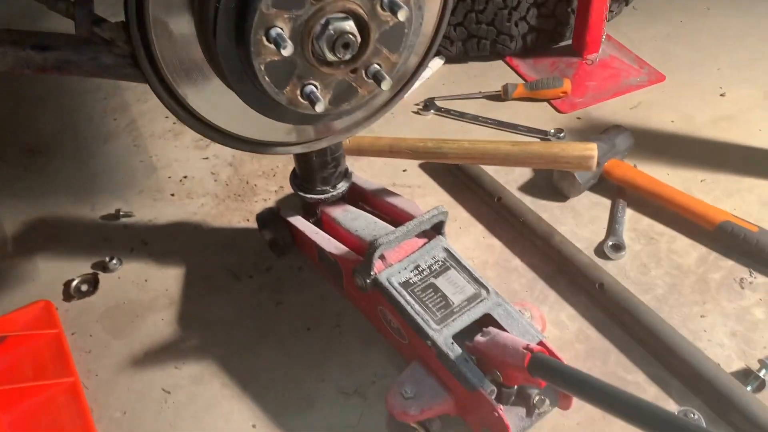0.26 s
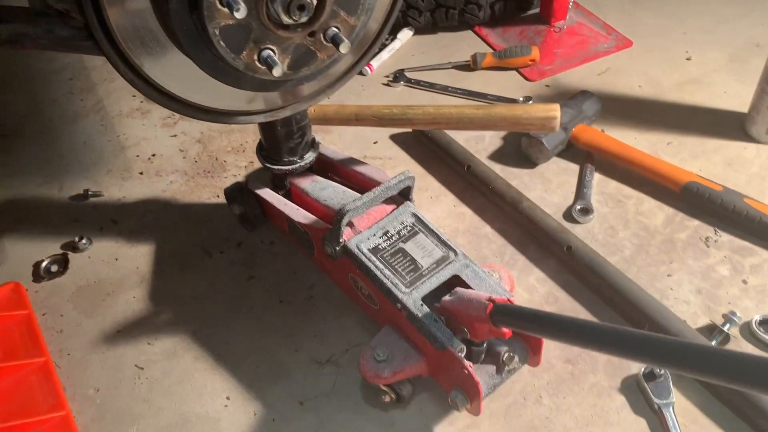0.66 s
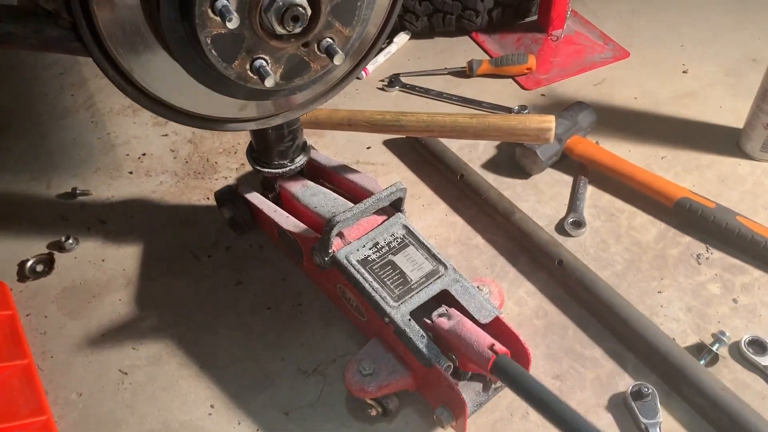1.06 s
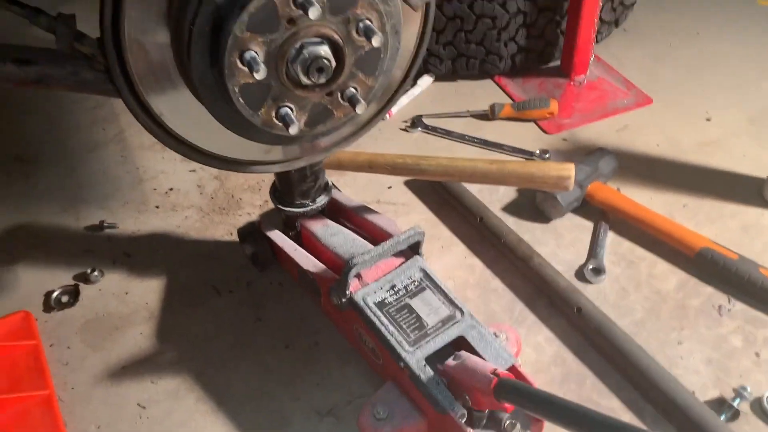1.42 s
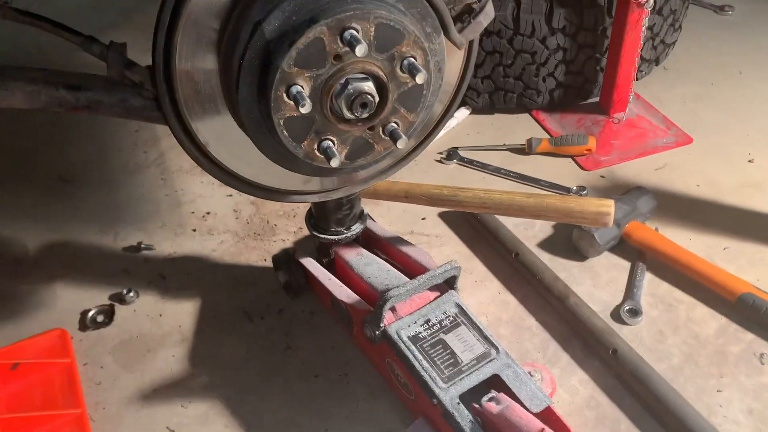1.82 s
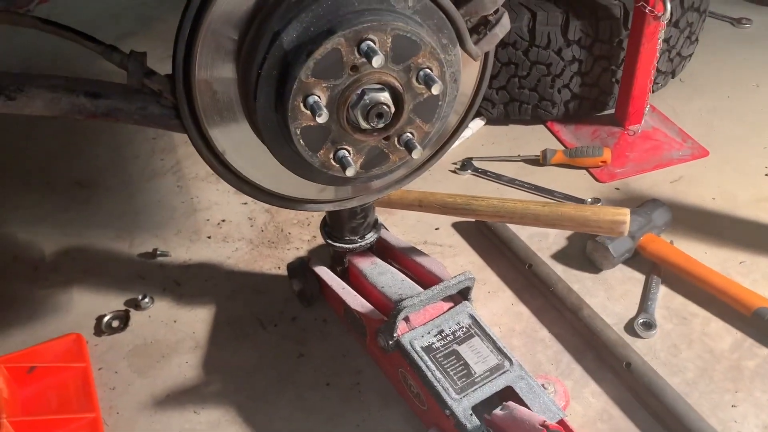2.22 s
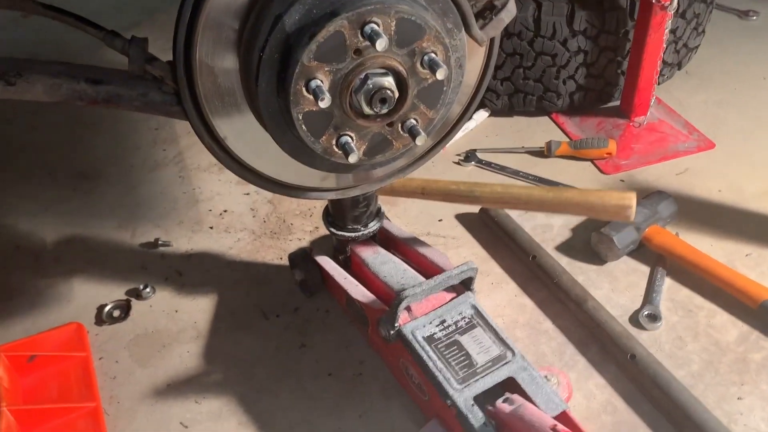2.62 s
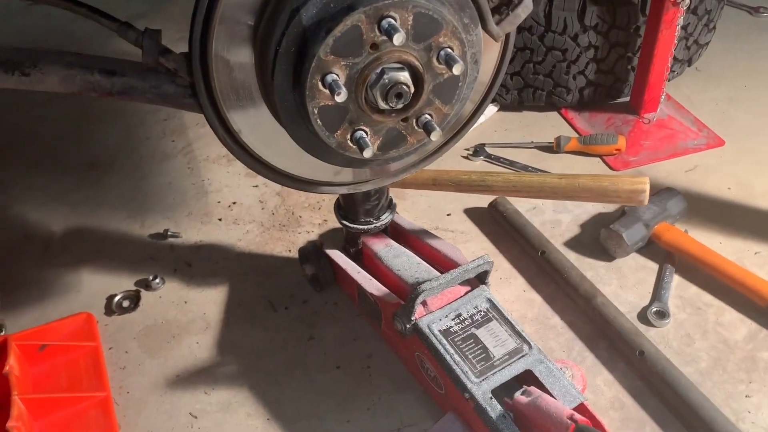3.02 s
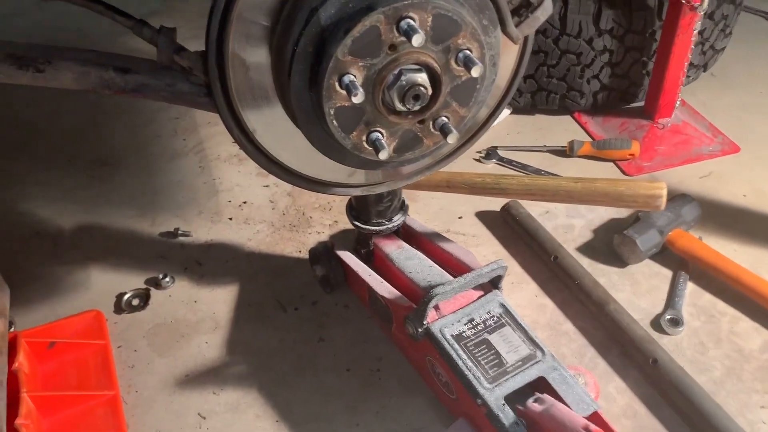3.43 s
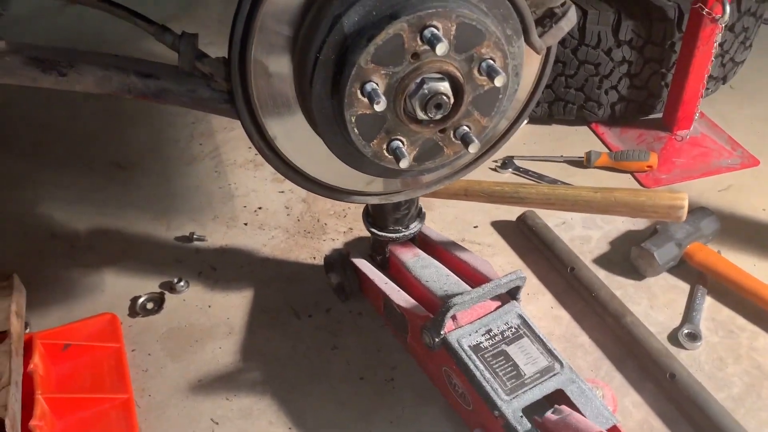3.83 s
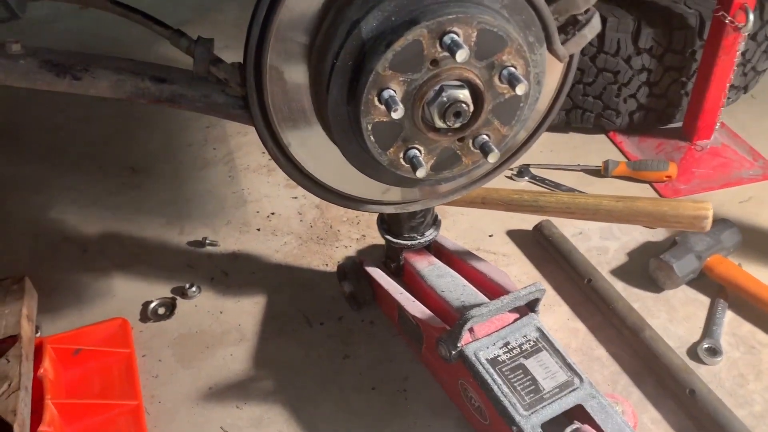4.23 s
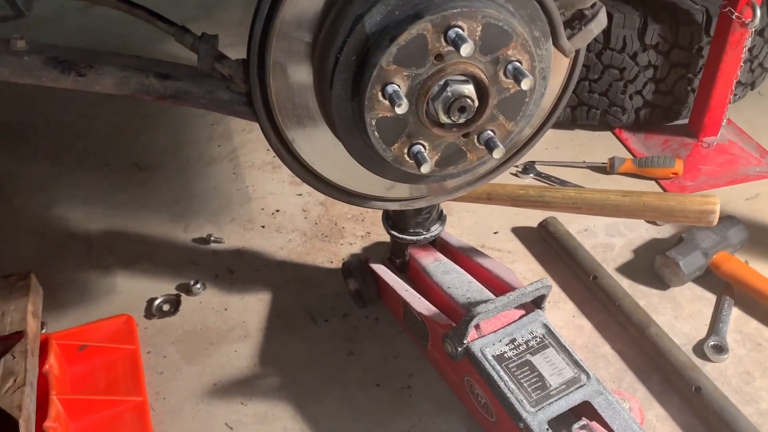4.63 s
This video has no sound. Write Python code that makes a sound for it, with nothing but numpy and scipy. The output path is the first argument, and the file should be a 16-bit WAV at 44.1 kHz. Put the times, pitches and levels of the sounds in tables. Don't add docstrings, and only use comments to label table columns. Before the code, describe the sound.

In a reverberant garage, a steel jack clicks and clanks with dry, mid-pitched knocks, bright pin pings and gritty scraping under load. Quiet gaps hold soft hiss and low handling rumble. One strong clank stands out near the middle, smaller clicks and rattles follow, and a heavy cluster of crashing blows with a floor thump ends it. Wide, close stereo phone pickup.

```python
import sys
import numpy as np
from scipy import signal
from scipy.fft import rfft, irfft, next_fast_len
from scipy.io import wavfile
from scipy.ndimage import uniform_filter1d

SR = 44100
rng = np.random.default_rng(int(sys.argv[2]) if len(sys.argv) > 2 else 0)


def wav_record(signal):
    frames = np.transpose(np.atleast_2d(signal))
    bounded = np.clip(frames, -1, 1)
    quanta = np.round(bounded * 32767).astype(np.int16)
    wavfile.write(sys.argv[1], SR, quanta)


def convert_level_to_amplitude(level_db):
    exponent = np.asarray(level_db, float) / 20
    return 10 ** exponent


N = 214568

# t/s, level/dB
JOLTS = [(.15, -62), (.6, -50), (.75, -66), (1.31, -50.5), (1.53, -68), (1.77, -54.5), (2.14, -56.5),
         (2.41, -44.5), (2.61, -58), (3.03, -51), (3.51, -44.5), (3.68, -50.5), (3.9, -52), (4.04, -43),
         (4.27, -46), (4.562, -49.5), (4.87, -53)]
# t/s, level/dB
STIR = [(0, -67), (.07, -81), (.2, -72), (.42, -59), (.81, -56), (1.0, -61), (2.19, -64), (2.45, -51),
        (2.97, -60), (3.3, -74), (3.4, -61), (3.54, -62), (4.08, -51), (4.72, -43.5), (4.87, -23.5)]
# f/Hz, level/dB per Hz
AIR_COLOUR = [(80, -0.5), (160, -13), (300, -9), (500, -10), (750, -13), (1900, -14), (4000, -23.5),
              (8000, -36), (16000, -54.5)]

# t/s, level/dB, main note f/Hz, brightness/dB
KNOCKS = [(.647, -39.5, 1960, -3.5), (.668, -27, 2190, -10.5), (1.7235, -13.5, 1953, -8),
          (1.745, -25, 1330, -4.5), (2.3538, -7, 2260, -5.5), (2.527, -28.5, 2340, -4.5),
          (3.381, -32, 1930, 1.5), (3.494, -47, 1700, 7), (3.664, -32, 1680, -3), (3.734, -33.5, 2060, -15),
          (3.811, -22, 2100, -15), (3.983, -22, 990, -7), (4.111, -43, 2100, 10), (4.494, -29.5, 873, -8),
          (4.738, -5, 1210, -6)]
# t/s, level/dB, main note f/Hz, brightness/dB
TICKS = [(.558, -34, 1930, -12), (.818, -35, 1880, -16), (.956, -36.5, 1380, -15.5),
         (1.288, -25, 1640, -39), (1.439, -37, 1960, -6), (1.638, -46, 1730, -7), (2.115, -27.5, 2130, -15),
         (2.285, -31, 1340, -13), (2.555, -23, 1990, 0.5), (2.573, -17.5, 1324, -11),
         (2.668, -32, 1610, -11.5), (2.693, -24.5, 1700, -16), (2.717, -26.5, 1680, -28),
         (2.748, -29.5, 1880, -33), (2.78, -74, 1850, -30), (2.912, -34.5, 1310, -64),
         (3.1, -39.5, 1110, -31), (3.325, -55, 1760, -3), (3.52, -44, 1430, 9), (3.926, -31, 1880, -8.5),
         (4.158, -37, 1910, 14.5), (4.407, -33.5, 1890, -3.5), (4.584, -34, 959, -1.5),
         (4.757, -8, 1210, -2.5)]
# t/s, level/dB, main note f/Hz, brightness/dB
CLICKS = [(.186, -64.5, 2250, 11), (.898, -27, 1370, -13), (.663, -34, 1840, -16),
          (1.239, -22.5, 2030, -1.5), (1.276, -22, 1690, -14), (1.318, -57, 1700, 14),
          (1.736, -19.5, 3140, -9.5), (1.756, -24.5, 990, -10), (2.363, -20, 2310, -14),
          (3.424, -13.5, 1697, -31), (3.483, -44, 1370, -15), (4.135, -17, 2140, -13),
          (4.316, -38, 2180, -1)]
# t/s, level/dB, main note f/Hz, brightness/dB
RATTLES = [
    (.462, -47, 1990, -7.5),
    (.572, -36.5, 1640, -7.5),
    (.851, -43.5, 1950, -24),
    (2.086, -33.5, 1950, 2.5),
    (2.957, -29.5, 1960, -4.5),
    (3.779, -30.5, 1880, 5),
    (4.62, -35, 1880, -22),
]
# t/s, level/dB, main note f/Hz, brightness/dB
SLAMS = [
    (4.722, -2, 1900, -9),
    (4.772, -3.5, 778, -8),
    (4.796, -8.5, 1520, -1),
]
# edge at 3-6.5 kHz/dB, sizzle above/dB, rattle length/s
KNOCK, TICK, CLICK = (0.52, -13.5, 0.0056), (0.5, -0.87, 0.0058), (-30, 0.5, 0.0049)
RATTLE, SLAM = (-1.1, 3.5, 0.018), (0.57, -25, 0.01)
LEAD_IN_S, LEAD_IN_DB = 0.012, -18
# f/Hz, level/dB, time to fall 60 dB/s
FRAME = [(528.2, -8.5, 0.27), (605, -5, 0.15), (747, -10.5, .12), (952, 3.5, 0.037), (1330, -3.5, 0.043),
         (1325, -2.5, 0.15), (1600, -20, 0.44), (1626, 0.5, 0.21), (1960, 15, 0.027), (2180, 3.5, 0.1),
         (3020, -8.5, 0.14), (3830, 0.5, 0.038)]

# f/Hz, time to fall 60 dB/s
GARAGE = [(120, 0.7), (330, 0.69), (870, 0.62), (2300, 0.71), (6060, 0.5), (16000, 0.21)]
GARAGE_DB = -8.5
# t/s, level/dB
SNAPS = [(0.185, -56), (0.5591, -49), (0.6479, -37), (0.6689, -47), (0.818, -49), (0.852, -34),
         (0.891, -33), (0.9572, -51), (1.1872, -53), (1.2381, -27), (1.5529, -58), (1.7235, -28),
         (2.354, -28), (2.5541, -6), (2.6683, -40), (2.6933, -35), (2.9547, -13), (3.421, -28),
         (3.477, -38), (3.4934, -30), (3.5214, -32), (3.7808, -24), (3.984, -38), (4.1126, -20),
         (4.135, -20), (4.157, -11), (4.291, -33), (4.3163, -17.5), (4.4064, -34), (4.5321, -28),
         (4.5795, -31), (4.6329, -36), (4.7198, 4)]

# t/s of the top, rise/s, fall/s, level/dB, hiss/dB
SLIDES = [(.273, .065, 0.055, -23, -2.5), (.92, .1, 0.013, -50, -28), (1.128, 0.046, 0.043, -54, -9),
          (1.6, .2, 0.25, -50.5, -36), (2.36, .003, .03, -8.5, -13), (2.4, .03, 0.33, -34.5, -34),
          (2.58, .04, .022, -33, -25), (3.486, .035, 0.1, -41, 6), (3.6, .12, 0.051, -54, -15),
          (3.79, .012, 0.24, -52, 7), (3.812, .02, 0.023, -24.5, -25), (4.078, 0.045, 0.13, -29.5, -3),
          (4.144, .07, 0.044, -26, -1), (4.33, .2, 0.013, -39.5, -1.5), (4.71, .03, .012, -30, 2),
          (4.723, .003, .03, -0.5, 3)]
# t/s of the top, rise/s, fall/s, level/dB, hiss/dB
DRAGS = [
    (.86, 0.029, 0.099, -41, -32),
    (2.095, .03, .12, -35, -1),
    (2.7, 0.11, 0.052, -38.5, -13),
    (4.02, 0.025, .12, -38, -32),
    (4.23, 0.096, 0.12, -42, -8),
    (4.5, 0.021, 0.36, -43.5, 10),
    (4.62, .022, 0.19, -32.5, -1.5),
    (4.745, .022, .35, -8, -9),
]
# f/Hz, level/dB per Hz
SCRAPE_COLOUR = [(350, -71), (600, -54), (896, -19), (1110, -8), (1640, -7), (2040, -7.5), (2860, -9.5),
                 (3140, -12.5), (7000, -30), (9100, -59), (15400, -120)]
SLIDE_LOW_DB, DRAG_LOW_DB = -23, -9.5
STROKE_ENDS_DB, STROKE_BEND = -34.5, 1.58
HISS_FOLLOWS = 1.32

# t/s, length/s, level/dB, f/Hz
GROANS = [
    (.24, .075, -44, 1170),
    (.255, .04, -42, 2050),
    (.463, .015, -50, 2000),
    (.86, .04, -52, 1950),
    (.9, .05, -53, 780),
    (3.0, .1, -55, 320),
    (3.67, .1, -60, 5650),
    (4.0, .07, -53, 560),
]
# t/s, length/s, level/dB, f/Hz
CREAKS = [(.585, .065, -59, 574), (.855, .035, -58, 3950), (1.53, .13, -62, 486), (1.54, .16, -64, 5500),
          (2.68, .07, -55, 570), (3.12, .24, -71, 1502), (3.33, .04, -66, 1500), (3.475, .03, -58, 5600),
          (4.49, .09, -48, 902), (4.495, .05, -49, 1600), (4.5, .03, -55, 4100), (4.5, .18, -49, 330),
          (4.635, .06, -49, 1530)]

# t/s, level/dB, f/Hz, time to fall 60 dB/s
THUMPS = [(0.589, -42.5, 180, 0.088), (0.9, -43, 164.4, 0.087), (1.282, -37.5, 164.7, 0.11),
          (1.443, -43.5, 188, 0.075), (1.74, -35.5, 169.6, 0.11), (2.111, -37, 156.4, 0.15),
          (2.369, -33.5, 136, 0.18), (2.399, -36.5, 171, 0.19), (2.576, -34, 155.7, 0.14),
          (2.73, -46, 145, 0.13), (2.918, -48.5, 143.4, 0.36), (2.995, -35, 221, 0.096),
          (3.438, -35.5, 113.1, 0.18), (3.738, -41, 151, 0.18), (3.809, -42, 224.6, 0.18),
          (3.988, -35.5, 88, 0.07), (4.155, -30.5, 154.7, 0.18), (4.491, -42.5, 292, 0.37),
          (4.619, -49, 334, 0.36), (4.732, -11, 296, 0.063), (4.754, -6, 114, 0.12)]
# t/s, level/dB, added note of the struck spot f/Hz, ring time factor
PINGS = [(0.8604, -43, 6020, 0.87), (0.906, -41, 8570, 0.65), (1.2375, -27, 11300, 0.48),
         (1.3184, -40.5, 8700, 0.49), (1.7226, -25, 6800, 0.43), (2.0877, -24, 7970, 0.71),
         (2.2817, -40.5, 6760, 0.5), (2.3535, -26.5, 5160, 1.5), (2.5235, -19.5, 7910, 0.3),
         (2.5537, -16.5, 8910, 0.45), (2.6928, -39, 8050, 0.35), (2.9552, -26, 7970, 0.99),
         (3.382, -27, 8960, 0.56), (3.6647, -41.5, 5540, 0.76), (3.78, -14.5, 8990, 0.96),
         (4.125, -20, 7910, 0.4), (4.1584, -20, 8200, 0.25), (4.5796, -19, 14900, 0.92),
         (4.7217, -2, 8080, 0.74)]
# f/Hz, level/dB, time to fall 60 dB/s
TUBE = [(5580, -17, 0.67), (5860, -8, 0.21), (6670, -11.5, 0.21), (7970, 0.5, 0.15), (9126, 16, 0.069),
        (10270, -3.5, 0.061), (10900, -26, 0.031), (11100, -9.5, 0.047), (14330, -5.5, .12),
        (15000, -2, 0.13)]
LOOSE_FIT, LOOSE_HZ = 0.6, 25

# t/s, level/dB, rise time/s
ARM_BLOW, PIN_BLOW, AXLE_BLOW = (2.354, -20, 0.0068), (2.955, -37.5, 0.001), (4.724, -12.5, 0.0032)
# f/Hz, level/dB, time to fall 60 dB/s
ARM = [(1089, -5, 0.32), (1170, -13, 0.22), (1670, -13, 0.17), (1730, -12, .25), (2100, -13.5, .15),
       (2263, 1, 0.78), (3584, 4.5, 0.12), (4075, 3, 0.25), (596, -7, 0.4), (1360, -12, 0.37),
       (3590, -2, .3), (4382, -11, 0.35), (5200, -12, 0.11), (1184, -5.5, .7)]
# f/Hz, level/dB, time to fall 60 dB/s
PIN = [(1265, -10, .4), (1700, -6, 0.57), (3268, -1, 0.3), (3429, -14, 0.15), (3806, -16, 0.26),
       (4500, -6, .1), (5905, -5, 0.39), (6730, -4, 0.26), (7860, 2.5, 0.34), (8592, -12, .3)]
# f/Hz, level/dB, time to fall 60 dB/s
AXLE = [(129.4, 5.5, 0.17), (246.6, 7, 0.16), (342, 3.5, 0.18), (489, -4, 0.64), (620, 0, 0.47),
        (805.4, 6, 0.47), (950, -10, 0.26), (1247, -8, 0.39), (1580, -11, 0.42), (1620, -0.5, 0.71),
        (1880, -12, 0.94)]

# f/Hz, likeness 0-1
PORTS_SAME = [(60, 0.99), (600, 0.85), (1100, 0.57), (1900, 0.01), (2700, 0.52), (6000, 0.21), (7200, 0.7),
              (9000, 0), (16000, 0)]
# f/Hz, share 0-1
PORTS_LAG = [(500, .05), (1000, .2), (1600, .45), (2300, .85), (3500, 1)]
# f/Hz, level/dB
PORTS_TILT = [(60, -0.5), (200, 1), (700, 0.5), (1290, 3.5), (2380, 1), (4400, 0), (8120, -3.5),
              (15000, 1.5)]
PORT_DELAY_S = 258e-6
DIP_S, DIP_HALF_S = 2.772, 0.011


def evened(x):
    return x / np.sqrt(np.mean(x ** 2) + 1e-20)


def read(points, hz):
    f, value = np.transpose(points)
    return np.interp(np.log(hz + 1), np.log(f + 1), value)


def add(mix, s, sound):
    part = mix[:, round(s * SR):][:, :sound.shape[1]]
    part += sound[:, :part.shape[1]]


def band(x, lo_hz, hi_hz):
    sos = signal.butter(2, [lo_hz, min(hi_hz, SR / 2.1)], "band", fs=SR, output="sos")
    return evened(signal.sosfilt(sos, x))


def coloured(x, spectrum):
    hz = np.fft.rfftfreq(x.shape[-1], 1 / SR)
    return evened(irfft(rfft(x) * convert_level_to_amplitude(read(spectrum, hz)), x.shape[-1]))


def patchy(x):
    bins = x.shape[1] // 2 + 1
    bumps = evened(uniform_filter1d(rng.standard_normal(bins), size=max(bins // 36, 1)))
    return evened(irfft(rfft(x) * convert_level_to_amplitude(2.2 * bumps), x.shape[1]))


def gritty(count, grit_db):
    clumps = evened(uniform_filter1d(rng.standard_normal(count), size=90))
    return evened(rng.standard_normal((2, count)) * convert_level_to_amplitude(grit_db * clumps))


def ringing(modes, t, spread_db):
    hz, db, t60 = np.transpose(modes)[..., None]
    weight, phase = rng.random((2, 2, len(modes), 1))
    fading = convert_level_to_amplitude(db + spread_db * (weight - 1.0) - 60 * t / t60)
    return (fading * np.sin(2 * np.pi * (hz * t + phase))).sum(1)


def background():
    t = np.arange(N) / SR
    hand = 0
    for s, db in JOLTS:
        hand = hand + convert_level_to_amplitude(db + np.minimum(125 * (t - s), 117 * (s - t)))
    rumble = band(band(rng.standard_normal((2, N)), 15.0, 110), 3.4, 97) * hand
    air = convert_level_to_amplitude(np.interp(t, *np.transpose(STIR))) * coloured(gritty(N, grit_db=3.0), AIR_COLOUR)
    hiss = convert_level_to_amplitude(-79) * rng.standard_normal((2, N))
    return rumble + air + hiss


def clank(db, hz, edge_db, sizzle_db, length):
    t = np.arange(7000) / SR - LEAD_IN_S
    after = np.maximum(t, 0)
    push = (1 - np.exp(-after / 0.00095)) * np.exp(-after / max(length, 0.001))
    push = push + convert_level_to_amplitude(LEAD_IN_DB) * (t < 0) * (1 + t / LEAD_IN_S)
    grit = gritty(len(t), grit_db=2.0)
    struck = np.sin(2 * np.pi * (hz * t + np.array([[0], [1 / 4]])))
    note = (0.65 * struck + 0.69 * band(grit, hz * 0.912, hz * 1.066)) * push
    body = 0.57 * band(band(grit, 1007, 3280), 460, 3630)
    edge = convert_level_to_amplitude(edge_db) * patchy(band(grit, 2740, 5640))
    sizzle = convert_level_to_amplitude(sizzle_db) * patchy(band(grit, 8860, 14700))
    broad = (body + edge + sizzle) * push
    frame = signal.fftconvolve(grit * push, ringing(FRAME, t - t[0], spread_db=6.5), axes=1)[:, :len(t)]
    frame = 0.66 * frame / abs(frame).max()
    direct = broad + frame + note
    to_room = 1.49 * broad + (frame + note) / 5
    return convert_level_to_amplitude(db - 4.0) * np.vstack([direct, to_room])


def garage(x):
    taps = np.zeros((2, SR))
    at = np.arange(400, SR - 20, 20) + rng.integers(0, 20, (2, (SR - 401) // 20))
    np.put_along_axis(taps, at, rng.choice([-1., 1.], at.shape), 1)
    hz, t, z = signal.stft(taps, SR, nperseg=256)
    dying = convert_level_to_amplitude(-60 * t / read(GARAGE, hz)[:, None])
    tail = signal.istft(z * dying, SR, nperseg=256)[1]
    return signal.fftconvolve(x, tail / np.linalg.norm(tail[0]), axes=1)[:, :N]


def snap(db):
    t = np.arange(600) / SR
    return convert_level_to_amplitude(db - 12) * band(rng.standard_normal((2, len(t))), 1800, 21000) * np.exp(-t / 0.00047)


def scrape(top, rise, fall, db, hiss_db, drag_db):
    rise, fall = max(rise, 0.002), max(fall, 0.005)
    t = np.arange(-rise, fall, 1 / SR)
    stroke_db = STROKE_ENDS_DB * np.where(t < 0, -t / rise, t / fall) ** STROKE_BEND
    grit = gritty(len(t), grit_db=0.5)
    groan = signal.fftconvolve(grit, ringing(FRAME, t - t[0], spread_db=2), axes=1)[:, :len(t)]
    rub = 0.79 * coloured(grit, SCRAPE_COLOUR) + 0.44 * band(groan, 780, 3200)
    hiss = convert_level_to_amplitude(hiss_db + (HISS_FOLLOWS - 1) * stroke_db) * band(grit, 3600, 14700)
    drag = convert_level_to_amplitude(drag_db) * band(grit, 180, 900)
    slips = evened(signal.fftconvolve(rng.standard_normal(len(t)), np.hanning(700), "same"))
    swell = convert_level_to_amplitude(db + stroke_db + 2.0 * slips - 8.0)
    return top - rise, swell * patchy(rub + hiss + drag) * signal.windows.tukey(len(t), 0.08)


def creak(length, db, hz):
    count = round(length * SR)
    fuzzy = band(rng.standard_normal((2, count)), hz * 0.96, hz * 1.04)
    return convert_level_to_amplitude(db) * fuzzy * np.hanning(count) ** 0.18


def thump(db, hz, t60):
    t = np.arange(14000) / SR
    modes = [(hz, 0, t60), (1.47 * hz, -5, 0.69 * t60), (2.15 * hz, -7, 0.99 * t60)]
    tone = ringing(modes, t, spread_db=-2.5)[:1]
    puff = band(rng.standard_normal((2, len(t))), 72, 590) * convert_level_to_amplitude(-3.0 - 60 * t / t60)
    return convert_level_to_amplitude(db - 2.5) * (tone + puff) * (1 - np.exp(-t / 0.0039))


def ping(db, hz, ring):
    t = np.arange(14000) / SR
    modes = [(f, level, t60 * ring) for f, level, t60 in TUBE] + [(hz, 7, 0.12 * ring)]
    twins = [(f * rng.uniform(1.004, 1.014), level + 7.5, 0.78 * t60) for f, level, t60 in modes]
    slow = np.exp(-2 * np.pi * LOOSE_HZ / SR)
    wobble = evened(signal.lfilter([1], [1, -slow], rng.standard_normal(len(t))))
    sound = ringing(modes + twins, t, spread_db=10.5) * (1 + LOOSE_FIT * wobble)
    return convert_level_to_amplitude(db - 17.5) * sound * (1 - np.exp(-t / 0.00085))


def blow(modes, db, length):
    t = np.arange(22000) / SR
    noise = rng.standard_normal((len(modes), len(t)))
    flutter = signal.fftconvolve(noise, np.hanning(900)[None], "same")
    ring = 0
    for mode, shake in zip(modes, flutter):
        ring = ring + ringing([mode], t, spread_db=-1.0) * (1 + LOOSE_FIT * evened(shake))
    return convert_level_to_amplitude(db - 11.5) * ring * (1 - np.exp(-t / length))


def scene():
    still = background()
    jack, clanks = np.zeros((2, N)), np.zeros((4, N))
    kinds = ((KNOCKS, KNOCK), (TICKS, TICK), (CLICKS, CLICK), (RATTLES, RATTLE), (SLAMS, SLAM))
    for table, (edge_db, sizzle_db, length) in kinds:
        for s, db, hz, bright_db in table:
            sound = clank(db, hz, bright_db + edge_db, bright_db + sizzle_db, length)
            add(clanks, s - LEAD_IN_S, sound)
    for table, low_db in ((SLIDES, SLIDE_LOW_DB), (DRAGS, DRAG_LOW_DB)):
        for row in table:
            add(jack, *scrape(*row, low_db))
    singles = ((SNAPS, snap), (GROANS, creak), (CREAKS, creak), (THUMPS, thump), (PINGS, ping))
    for table, source in singles:
        for s, *row in table:
            add(jack, s, source(*row))
    for (s, *row), modes in ((ARM_BLOW, ARM), (PIN_BLOW, PIN), (AXLE_BLOW, AXLE)):
        add(jack, s, blow(modes, *row))
    room = convert_level_to_amplitude(GARAGE_DB) * garage(jack + clanks[2:])
    return jack + clanks[:2] + room + still


def low_pass(x):
    return signal.sosfilt(signal.butter(12, 16870, fs=SR, output="sos"), x)


def record(dry):
    size = next_fast_len(N + 4096)
    hz = np.fft.rfftfreq(size, 1 / SR)
    left, other = rfft(0.7 * np.tanh(dry / 0.75), size)
    same = np.clip(read(PORTS_SAME, hz), 0, 1)
    turn = 2 * np.pi * hz * PORT_DELAY_S * np.clip(read(PORTS_LAG, hz), 0, 1)
    tilt = convert_level_to_amplitude(read(PORTS_TILT, hz) / 2)
    right = (same * left * np.exp(1j * turn) + np.sqrt(1 - same ** 2) * other) / tilt
    left = left * tilt
    mid_gain = np.where(hz > 7000, np.clip(1.75 + 2.4 * np.cos(turn), 0.02, 1), 1)
    side_gain = np.where(hz > 7000, np.clip(1.75 - 2.4 * np.cos(turn), 0.02, 1), 1)
    mid = (left + right) / 2 * mid_gain
    side = (left - right) / 2 * side_gain
    top = 1 / (1 + (hz / 15650) ** 120) + 0.003
    ports = irfft(np.array([mid + side, mid - side]), size)
    ports = irfft(rfft(ports) * top * (hz < 16850), size)[:, :N]
    fade = np.clip(abs(np.arange(N) / SR - DIP_S) / DIP_HALF_S, 0.04, 1)
    return low_pass(ports * fade)


dry = scene()
out = record(dry)
wav_record(out)
```